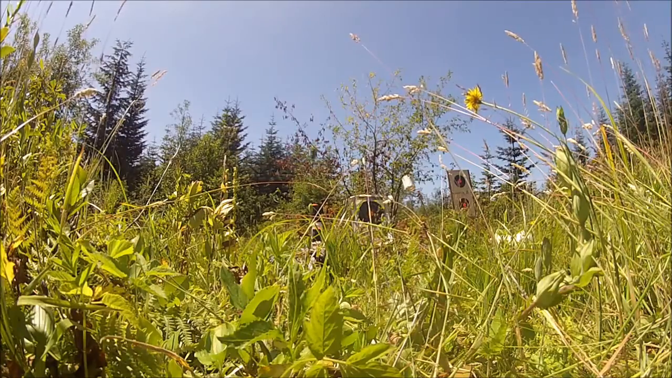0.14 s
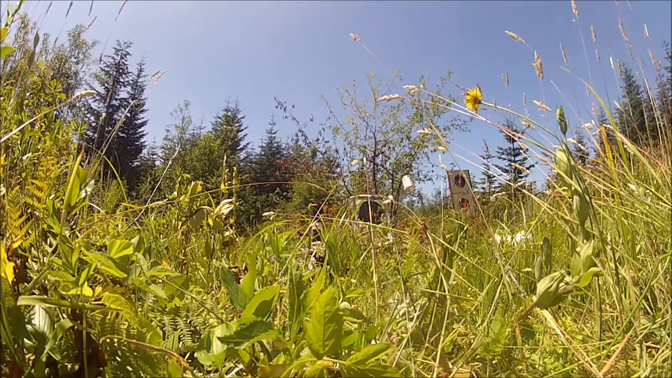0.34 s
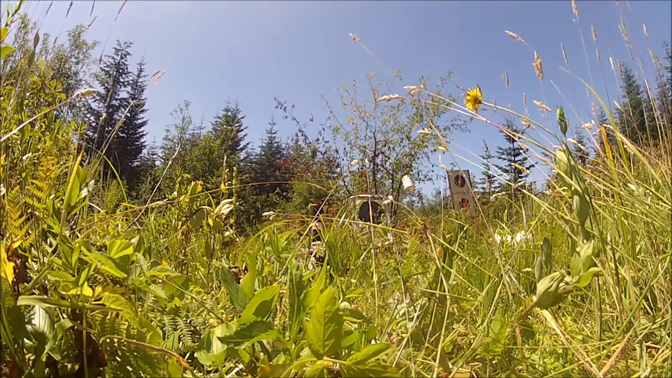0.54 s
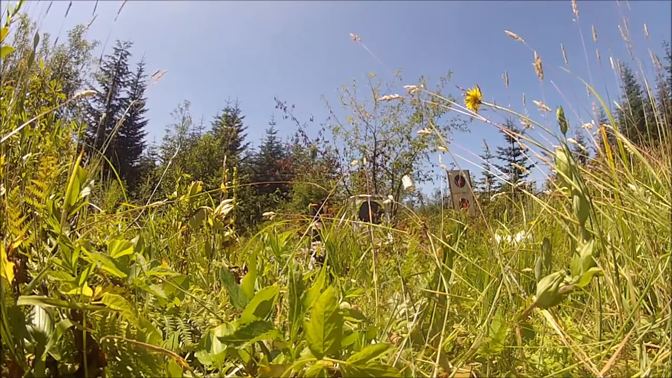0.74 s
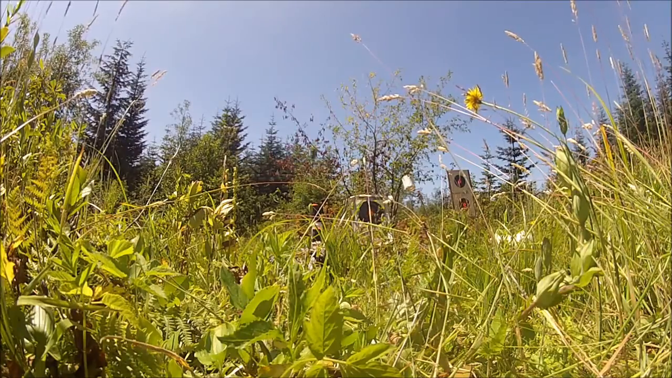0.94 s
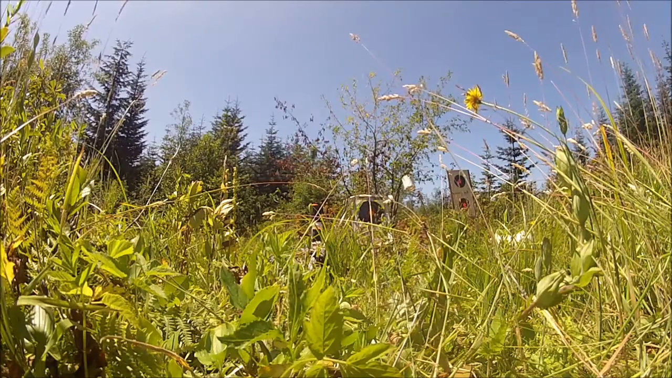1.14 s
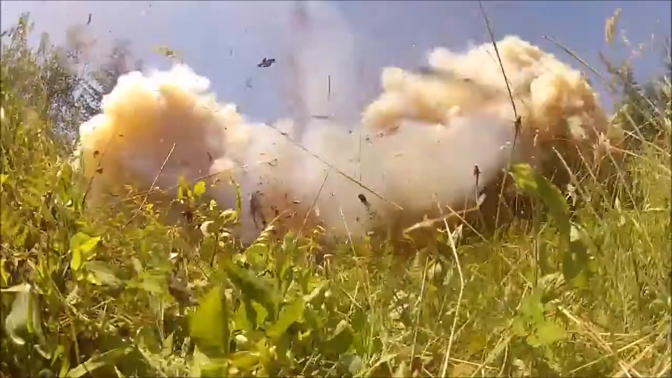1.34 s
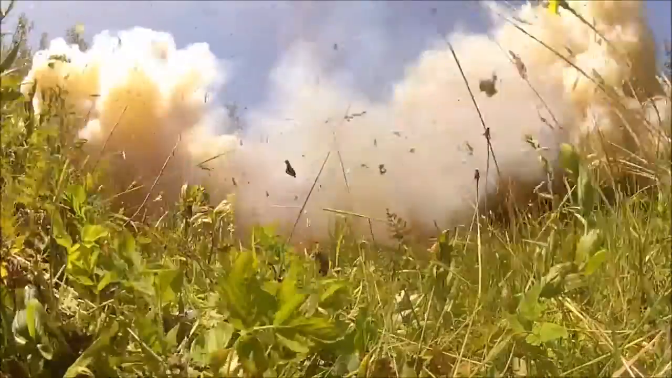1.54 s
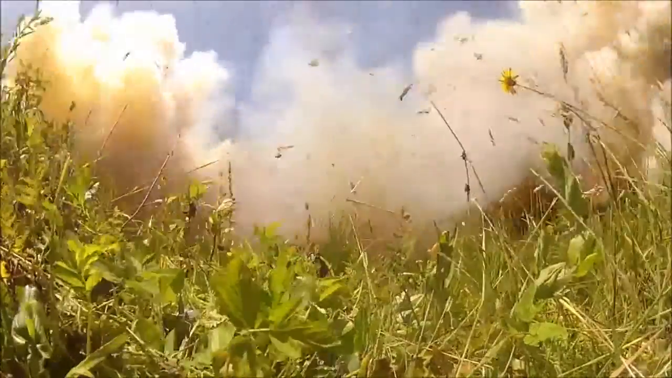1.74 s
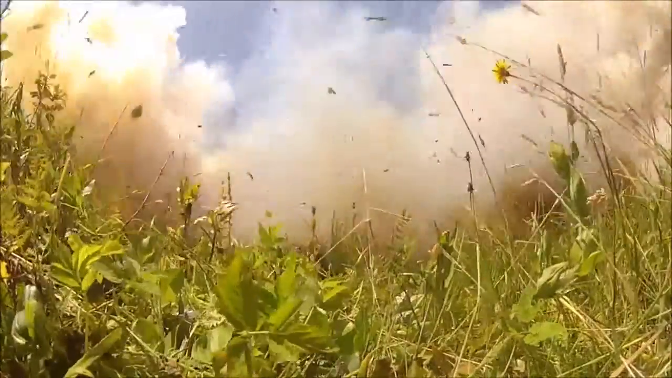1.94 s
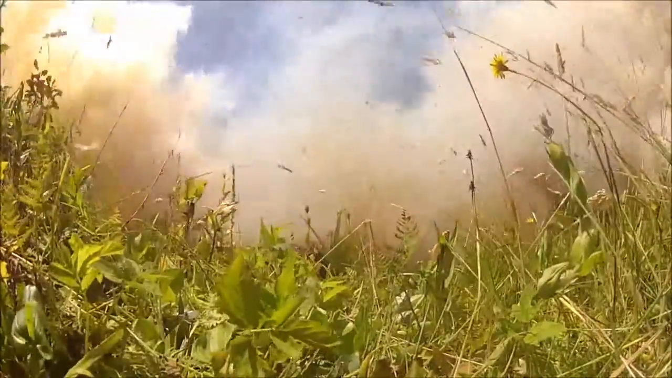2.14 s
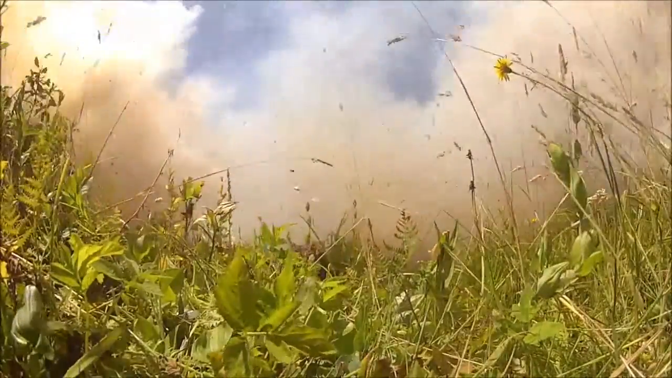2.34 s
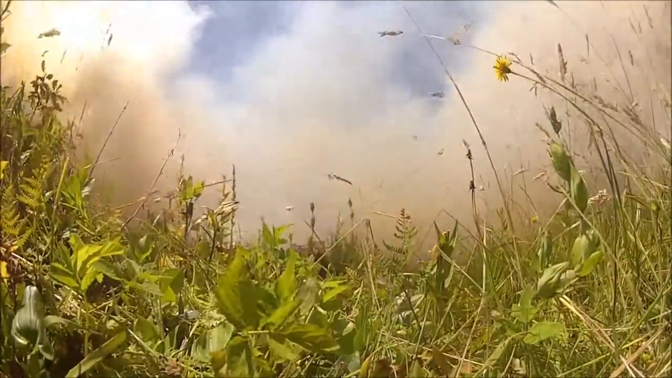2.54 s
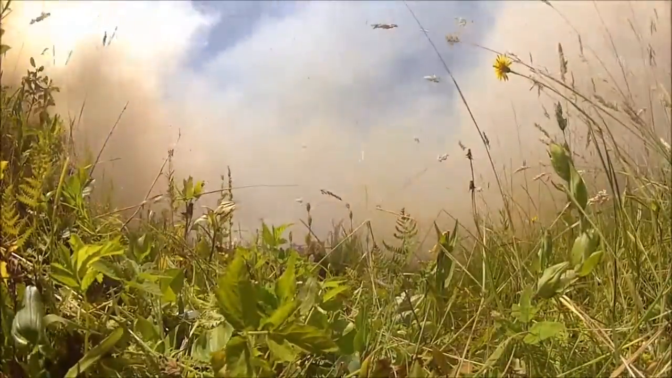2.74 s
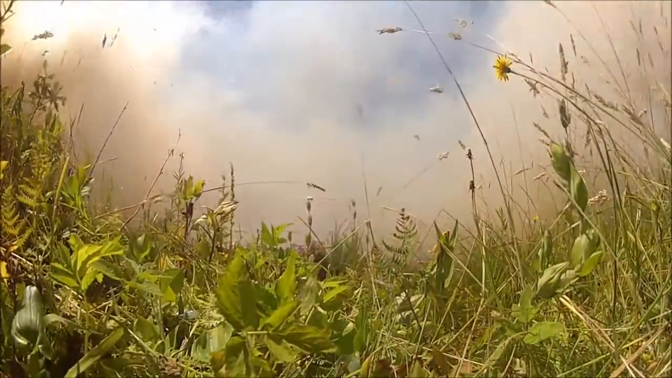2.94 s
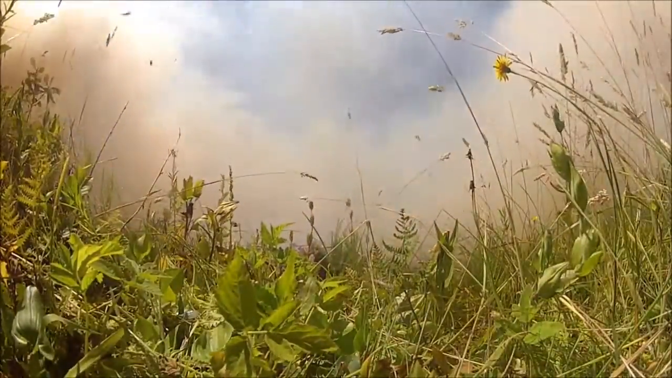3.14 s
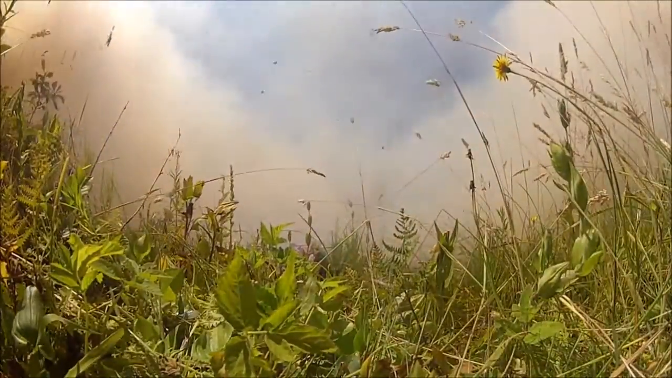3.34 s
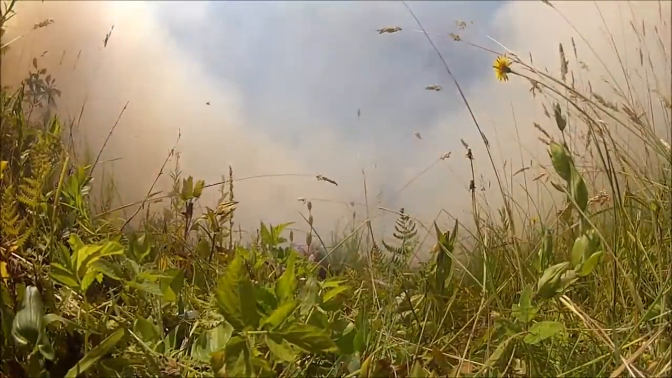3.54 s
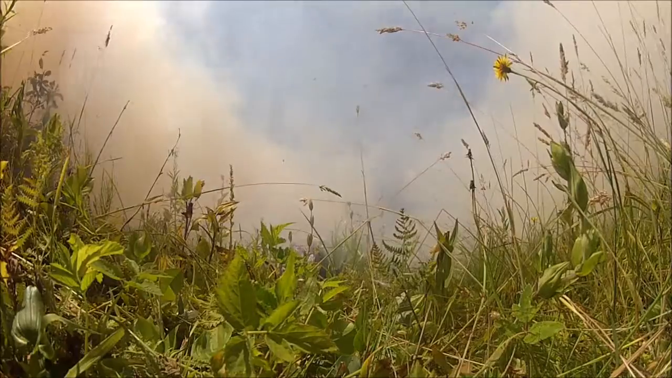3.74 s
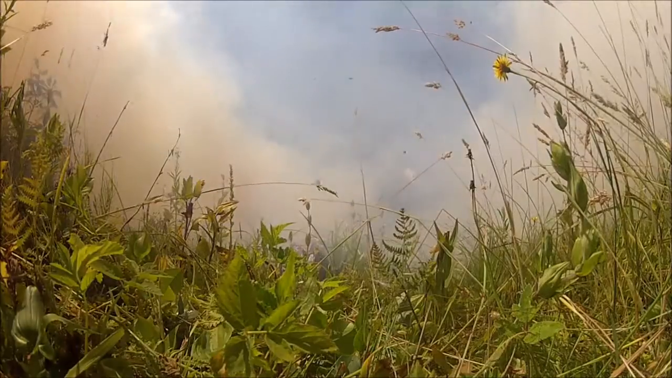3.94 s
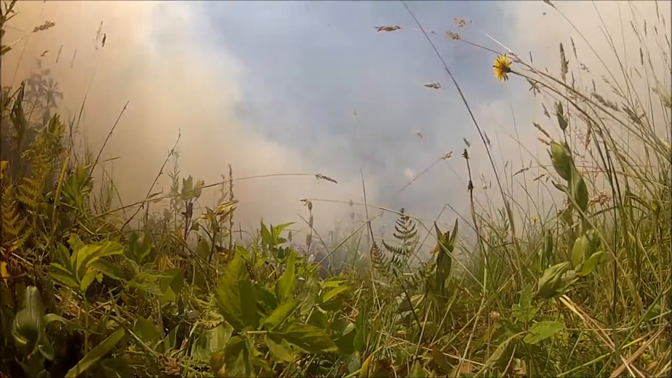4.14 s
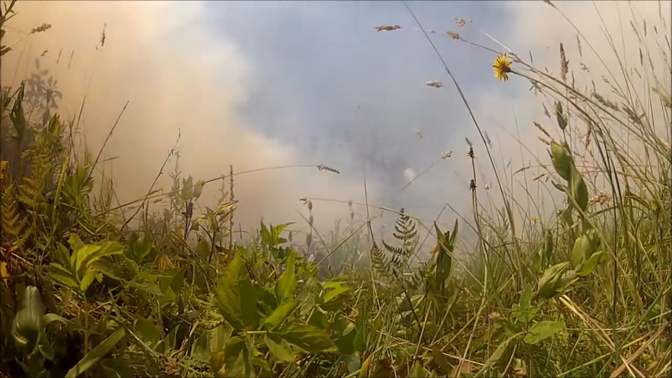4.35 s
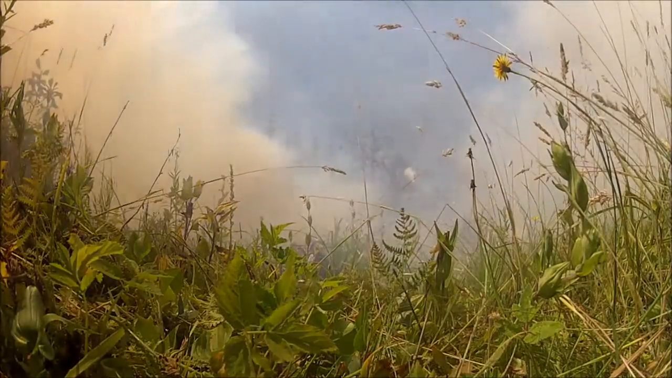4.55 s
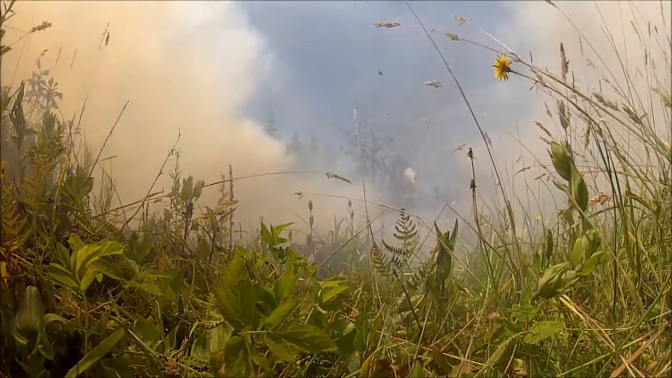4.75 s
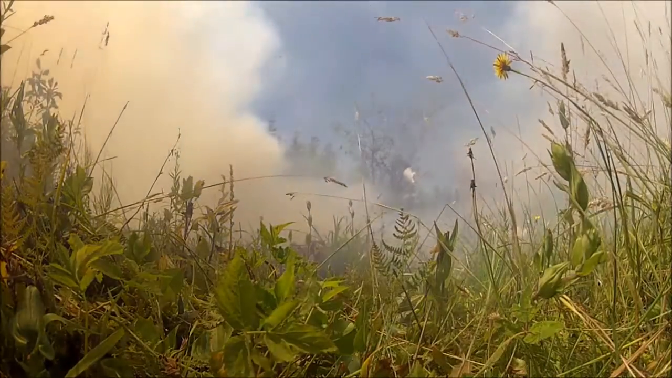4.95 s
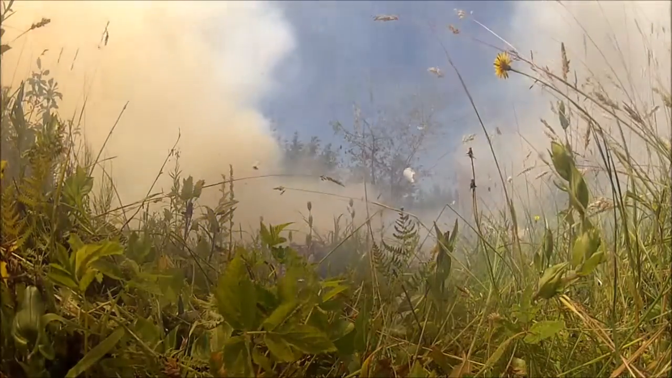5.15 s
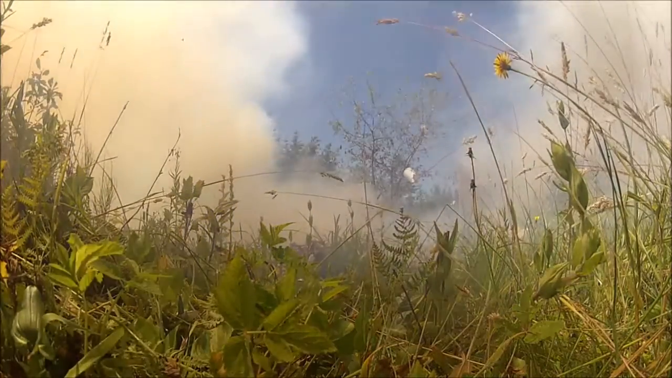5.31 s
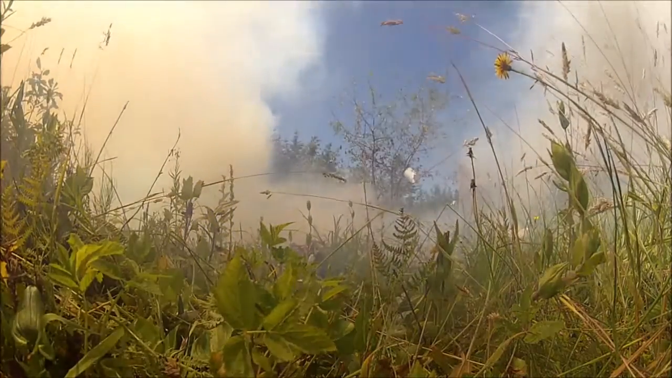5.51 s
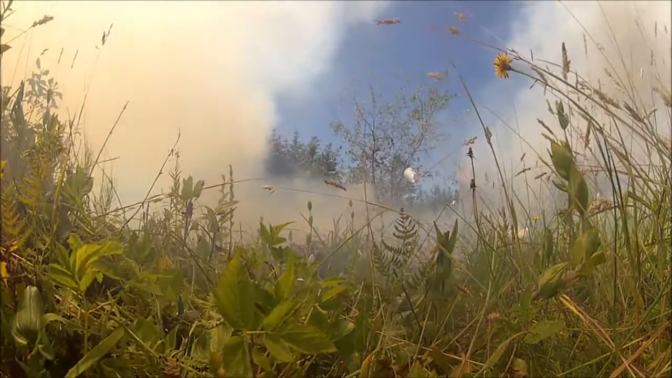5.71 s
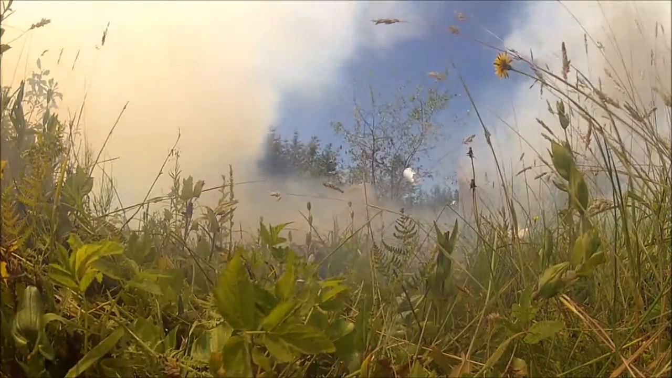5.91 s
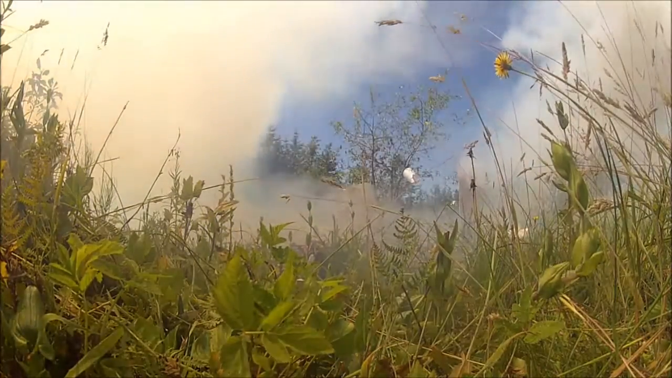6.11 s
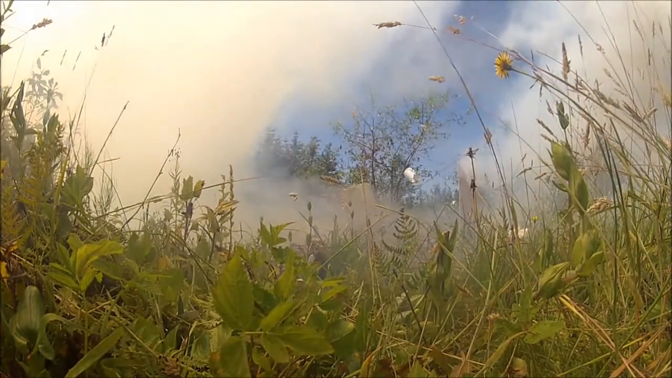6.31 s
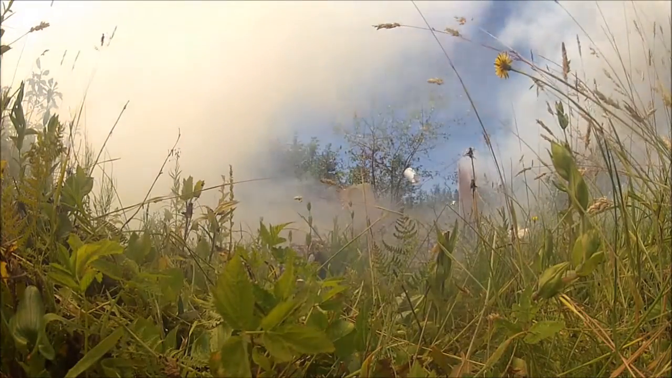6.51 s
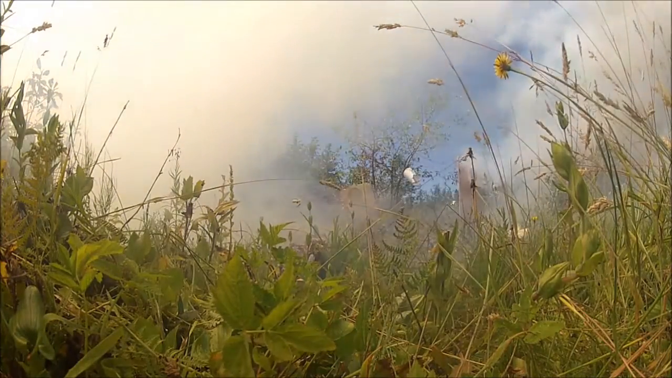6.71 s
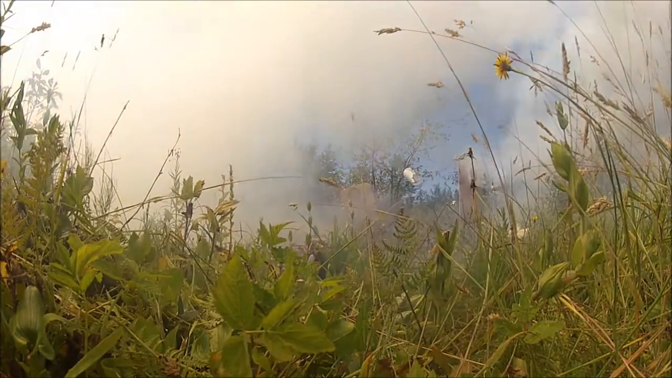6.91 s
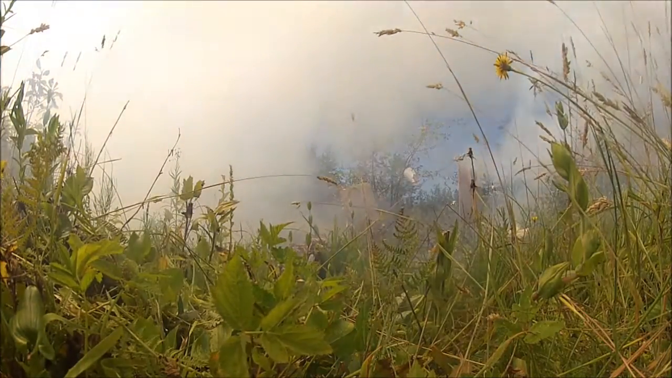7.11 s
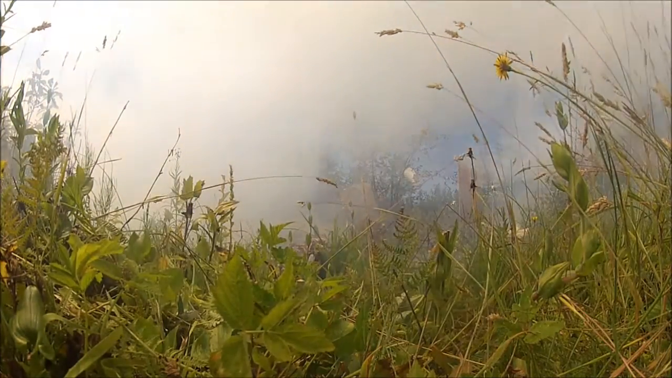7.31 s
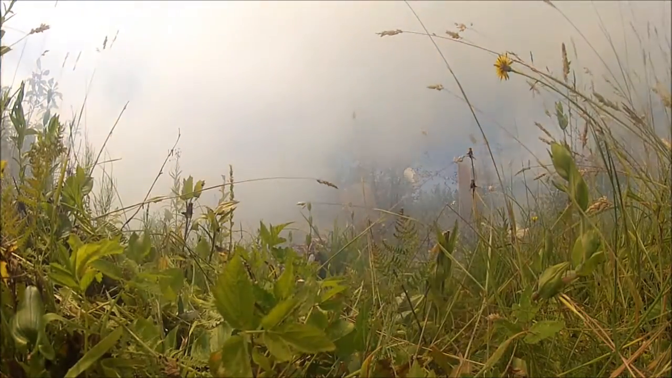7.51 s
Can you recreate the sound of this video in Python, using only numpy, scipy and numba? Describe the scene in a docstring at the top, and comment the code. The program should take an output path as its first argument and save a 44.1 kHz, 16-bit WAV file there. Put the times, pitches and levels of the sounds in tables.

```python
"""Soft air in a forest clearing is heard first, then an explosive target goes off near a small cased camera.
The shock, noise over a few big pressure swings, overloads the microphone. A noise band sinks in pitch as
the boom, and filtered noise is the roar rolled back by the woods. Then soil and stones rain down as random
grains and short noise bursts; a soft clod and a hard stone hit the camera's case."""
import sys
import numpy as np
from scipy import signal
from scipy.fft import rfft, irfft
from scipy.io import wavfile
from scipy.ndimage import uniform_filter1d
from numba import njit

SR = 44100
rng = np.random.default_rng(int(sys.argv[2]) if len(sys.argv) > 2 else 0)


def dump_mix(stems):
    """Bounce the given channels to the path in sys.argv[1] as a 16-bit WAV at rate SR."""
    frames = np.atleast_2d(stems).T  # one column per channel
    limited = np.clip(frames, -1, 1)  # hard clip at full scale
    pcm = np.round(limited * 32767).astype(np.int16)
    wavfile.write(sys.argv[1], SR, pcm)


N = 338247
T = np.arange(N) / SR
SHOCK_S = 1.3385  # the shock reaches the camera
RETURN_S = 2.05  # the main echo comes back from the forest edge


def undb(db):
    """Turn decibels into a gain."""
    return 10 ** (np.asarray(db) / 20)


def unit(x):
    """Scale a sound to an average (rms) level of 1."""
    return x / np.sqrt(np.mean(x ** 2))


def even(x, seconds):
    """Level out a sound: rms 1 within a sliding window."""
    power = np.abs(uniform_filter1d(x ** 2, max(int(seconds * SR), 2)))
    return x / np.sqrt(power + 1e-12)


def peak(x, size=128):
    """Scale a hit so that its loudest 3 ms have rms 1."""
    return x / np.sqrt(uniform_filter1d(x ** 2, size).max())


def noise():
    """White noise: all pitches equally strong."""
    return rng.standard_normal(N)


def walk(rate):
    """Slow random wander around 0, spread near 1, with `rate` new values per second."""
    return 1.2 * np.interp(T * rate, np.arange(2000), rng.standard_normal(2000))


def fade(t, t60):
    """Exponential decay: 60 dB quieter after t60 seconds."""
    return np.exp(-np.log(1000) * t / max(t60, 1e-3))


def add(out, s, x):
    """Mix x into out, starting at s seconds."""
    i = int(s * SR)
    out[i:i + len(x)] += x[:N - i]


def colour(x, points, size=8192):
    """Filter that follows (f/Hz, level/dB) points and falls away below the first."""
    hz, db = np.transpose(points)
    f = np.arange(size // 2 + 1) * SR / size + 1
    gain_db = np.interp(np.log(f), np.log(hz), db) + 20 * np.minimum(np.log(f / hz[0]), 0)
    # folding the cepstrum makes the filter answer at once, with nothing before the sound
    cepstrum = irfft(np.log(undb(gain_db)))
    cepstrum[1:size // 2] *= 2
    cepstrum[size // 2 + 1:] = 0
    response = irfft(np.exp(rfft(cepstrum)))
    return signal.fftconvolve(x, response)[:len(x)]


@njit
def svf(x, hz, width):
    """Band-pass filter whose centre and width may move."""
    y, b, l = np.empty(len(x)), 0., 0.
    for i in range(len(x)):
        g, k = np.tan(np.pi * hz[i] / SR), width[i] / hz[i]
        v = (b + g * (x[i] + 1e-18 - l)) / (1 + g * (g + k))
        b, l, y[i] = 2 * v - b, l + 2 * g * v, k * v
    return y


def band(x, hz, width_hz):
    """One resonance, gain 1 at its centre."""
    return svf(x, hz * np.ones(len(x)), width_hz * np.ones(len(x)))


def double_band(x, hz, width_hz):
    """The same resonance twice, for steeper sides."""
    return band(band(x, hz, width_hz), hz, width_hz)


@njit
def follow(x, attack, release):
    """Track the loudness: rise fast, fall slowly."""
    out, e = np.empty(len(x)), 0.
    for i in range(len(x)):
        e += (abs(x[i]) - e) * (attack if abs(x[i]) > e else release)
        out[i] = e
    return out


# filter curve for the still air: f/Hz, level/dB
AIR_FILTER = [(15, -39), (25, -1), (87, -5.5), (117, 0), (145, -5), (185, -2.5), (293, -6.5), (1070, -25),
              (4740, -33.5), (6050, -41.5), (12500, -40.5), (14800, -42.5), (16000, -58)]
AIR_DB, LATE_AIR_RISE_DB = -56.5, 1.4  # level before the shock; rise over the second after it


def clearing():
    """Soft low rush of air in the trees: filtered noise with a slowly wandering level."""
    air = unit(colour(noise(), AIR_FILTER)) * undb(0.88 * walk(6.7))
    return air * undb(AIR_DB + LATE_AIR_RISE_DB * np.clip(T - SHOCK_S, 0, 1))


# ringing tones (modes) of the camera case: f/Hz, level/dB, t60/s
CASE_MODES = [(1616, -7.5, 0.06), (2396, 2.5, .02), (2922, -3.5, 0.028), (3150, -0.5, .035),
              (3425, -5.5, .035), (3947, -6, .035), (4820, -3.5, 0.03), (5300, -5.5, 0.024),
              (7170, -7.5, 0.035), (9000, -7, 0.038), (9516, -4.5, .02), (14800, -4, 0.015)]


def case(x, size=4096):
    """The case answers a push by ringing at its own modes, each dying away at its own speed."""
    t = T[:size]
    ring = sum(undb(db) * np.sin(2 * np.pi * hz * t) * fade(t, t60) for hz, db, t60 in CASE_MODES)
    return signal.fftconvolve(x, ring)[:len(x)]


# filter curve for the crash noise, with a deep dip near 11 kHz: f/Hz, level/dB
CRASH_FILTER = [(180, -37), (300, 0.5), (946, -17.5), (1080, -16), (2980, -10), (3240, -7.5), (4990, -12.5),
                (5800, -26.5), (6960, -15), (8940, -18.5), (10700, -39.5), (14700, -34), (16000, -41)]
CRASH_LENGTH_S = .034  # after this the crash dies away fast


def shock(crash_db=-6, fall_db=13, ring_db=-4, swing_db=0, swing_hz=95, rise_hz_per_s=3500, push_db=-7):
    """The front arrives: a harsh crash shakes the case, over a few huge pressure swings."""
    t = T[:SR // 6]
    gate = fade(np.maximum(t - CRASH_LENGTH_S, 0), 0.057) * undb(crash_db - fall_db * t / CRASH_LENGTH_S)
    crash = unit(colour(noise(), CRASH_FILTER)) + undb(ring_db) * unit(case(noise()))
    crash = even(crash, 0.0022)[:len(t)]
    # the swings speed up as they go, then die away
    swing = -np.sin(2 * np.pi * (swing_hz * t + rise_hz_per_s * t ** 2 / 2))
    swing = swing * fade(np.maximum(t - .019, 0), 0.011) * np.minimum(.5 + t / 0.06, 1)
    # a slow heave of air lies under the swings
    push = -np.sin(2 * np.pi * 38 * t) * fade(t, 0.25)
    out = np.zeros(N)
    add(out, SHOCK_S, gate * crash + undb(swing_db) * swing + undb(push_db) * push)
    return out


def swell(db, rise_db_per_s, fall_db_per_s):
    """Gain that builds until the echo's main return and dies away after it."""
    before, after = np.maximum(RETURN_S - T, 0), np.maximum(T - RETURN_S, 0)
    return undb(db - rise_db_per_s * before - fall_db_per_s * after)


# the boom holds its pitch for a moment, then sinks towards a deep rumble
BOOM_START_HZ, BOOM_END_HZ, SINK_FROM_S, SINK_TIME_S = 190, 30, 1.41, .075
# filter curve for the roar: f/Hz, level/dB
ROAR_FILTER = [(40, -13), (100, -6), (170, 1), (280, 0), (420, -6.5), (660, -7.5), (850, -22), (1150, -35),
               (2000, -44)]
# main part and long tail of boom and roar: level/dB at the main return, rise/(dB/s), fall/(dB/s)
BOOM_MAIN = (-7, 5, 68)
BOOM_LONG = (-19, 20, 15)
ROAR_MAIN = (-17.5, 19, 20)
ROAR_LONG = (-35.5, 20, 6.7)


def echo(boom_width=0.83, burst_db=-16, burst_s=1.395, burst_t60=.12):
    """The boom sinks in pitch while the trees scatter a roar; each has a swell and a long tail."""
    sink = 1 + np.maximum(T - SINK_FROM_S, 0) / SINK_TIME_S
    hz = BOOM_END_HZ + (BOOM_START_HZ - BOOM_END_HZ) / sink
    boom = even(double_band(noise(), hz, boom_width * hz), 0.12)
    roar = even(colour(noise(), ROAR_FILTER), 0.04) * undb(1.2 * walk(25))
    # the nearest ground and bushes answer at once
    burst = undb(burst_db) * fade(np.maximum(T - burst_s, 0), burst_t60)
    boom_gain = np.hypot(swell(*BOOM_MAIN), swell(*BOOM_LONG))
    roar_gain = np.hypot(swell(*ROAR_MAIN) + burst, swell(*ROAR_LONG))
    return boom * boom_gain + roar * roar_gain


# thrown soil comes down in a steady shower, thins out and stops
SHOWER_START_S, SHOWER_FULL_S, SHOWER_THINS_S, SHOWER_END_S = 2.2, 2.9, 5.1, 5.95
SHOWER_STOP_DB_PER_S = 90


def shower(db, thin_db_per_s):
    """Gain of the falling soil: it sets in, holds and thins out."""
    onset = np.clip((T - SHOWER_START_S) / (SHOWER_FULL_S - SHOWER_START_S), 0, 1)
    thinning_db = thin_db_per_s * np.maximum(T - SHOWER_THINS_S, 0)
    stopping_db = SHOWER_STOP_DB_PER_S * np.maximum(T - SHOWER_END_S, 0)
    return onset * undb(db - thinning_db - stopping_db)


def grains(per_s, spread_db):
    """Random clicks of very unequal size."""
    size_db = spread_db * np.minimum(rng.exponential(size=N), 4)
    return (rng.random(N) < per_s / SR) * noise() * undb(size_db)


# filter curve for the hiss and patter: strongest near 2 kHz, with narrow dips
# near 6.1, 10.8 and 13.4 kHz: f/Hz, level/dB
HISS_FILTER = [(800, -15), (1300, -6), (2000, 2.5), (3200, -1), (5100, -10.5), (6100, -26), (7000, -12.5),
               (9300, -9.5), (10800, -18.5), (12200, -7), (13400, -18.5), (15300, -16)]
# grit blown about by the blast: level/dB at the main return, rise/(dB/s), fall/(dB/s)
GRIT_BLOWN = (-33.5, 1, 21)
# filter curve for distant lumps landing: f/Hz, level/dB
THUD_FILTER = [(120, -10.5), (300, 3.5), (500, 4), (760, 5), (980, -10.5), (1400, -17.5), (2500, -23)]
# basic rate of grains, which halves again and again after the return
GRAINS_PER_S, GRAINS_HALVE_S = 2400, 1.1


def fallout(hiss_db=-3, late_hiss_db=-8, patter_db=-5, ring_db=-8, smear_t60=0.012, tick_db=-5):
    """Grit hisses through the leaves, then thins into single ticks and the dull thuds of distant lumps."""
    blown, falling = swell(*GRIT_BLOWN), shower(db=-52.5, thin_db_per_s=15)
    hiss = unit(colour(noise(), HISS_FILTER)) * undb(0.93 * walk(28))
    # grains come down in clusters
    per_s = GRAINS_PER_S * .5 ** (np.maximum(T - RETURN_S, 0) / GRAINS_HALVE_S) * undb(7.3 * walk(22))
    clicks = grains(per_s=per_s, spread_db=3.4)
    # each one brushes the grass for a few milliseconds
    brush_power = signal.fftconvolve(clicks ** 2, fade(T[:SR // 20], smear_t60) ** 2)[:N]
    brush = noise() * np.sqrt(np.abs(brush_power))
    landings = unit(brush) + undb(tick_db) * unit(clicks)
    patter = unit(colour(landings, HISS_FILTER)) + undb(ring_db) * unit(case(landings))
    patter = even(patter, .4)
    thuds = even(colour(grains(per_s=210, spread_db=0), THUD_FILTER), .25)
    hiss_gain = np.hypot(undb(hiss_db) * blown, undb(late_hiss_db) * falling)
    patter_gain = np.hypot(undb(patter_db) * blown, falling)
    return hiss * hiss_gain + patter * patter_gain + thuds * shower(db=-52.5, thin_db_per_s=5)


def shudder(db=-4, hz=192, t60=.3, peak_s=1.405, rise_s=.04):
    """The shock leaves a brief low hum whose pitch wavers at random."""
    gain = np.clip(1 + (T - peak_s) / rise_s, 0, 1) * fade(np.maximum(T - peak_s, 0), t60)
    wavering_hz = hz * (1 + .08 * walk(90))
    return undb(db) * gain * np.sin(2 * np.pi * np.cumsum(wavering_hz) / SR)


def knock(t, t60, hz=660, width_hz=400):
    """Dull answer of the ground to a landing: a short noise burst through a resonance."""
    return peak(double_band(rng.standard_normal(len(t)) * fade(t, t60), hz, width_hz))


# filter curve for the contact noise, crumbs and scrapes, with a deep dip near 11 kHz: f/Hz, level/dB
CONTACT_FILTER = [(150, -14.5), (450, -12), (720, -10.5), (1200, -24), (1700, -3), (2400, 1), (4200, -2),
                  (6000, -16), (7400, -2.5), (9400, -5), (11000, -29), (13000, -24), (15000, -14)]
# falling stones and chips: t/s, level/dB before the common trim, ring f/Hz
CHIP_LANDINGS = [(1.4795, -22, 2600), (2.3574, -3, 1930), (2.5442, -27, 3160), (2.5857, -28, 2300),
                 (2.7102, -25.5, 2250), (2.7939, -15, 2150), (2.9623, -29, 2320), (3.1938, -21, 2720),
                 (3.2873, -31.5, 4400), (3.764, -26.5, 3100), (3.9609, -9.5, 3050), (3.9848, -7.5, 2680),
                 (4.0332, -27, 2430), (4.1223, -11.5, 4350), (4.1604, -34.5, 2270), (4.5358, -24, 2700),
                 (4.6687, -35, 3100), (4.9384, -25, 3100), (4.9795, -28, 2140), (5.0981, -22, 2330),
                 (5.121, -25.5, 2270), (5.334, -35.5, 3060), (5.3858, -35.5, 4300), (5.49, -40, 2400),
                 (5.9755, -39.5, 3090)]
# the soft ground yields: its knock grows only by a share of each dB of the blow
KNOCK_DB, KNOCK_SHARE = -24, .5
# smaller chips ring higher and knock less than a chip of the usual size
USUAL_CHIP_HZ, KNOCK_DB_PER_OCTAVE = 2400, -13


def chips(trim_db=-6, ring_db=2, ring_width_hz=1300, case_db=-11, tail_db=-14, contact_t60=.008,
          rattle_t60=0.021, rise_s=.0009, edge_db=-7.5):
    """Stones and chips land close by: a hard contact, a short rattle and a ring of their own."""
    out, t = np.zeros(N), T[:SR // 10]
    below = signal.butter(3, 6000, "low", fs=SR, output="sos")
    above = signal.butter(3, 6000, "high", fs=SR, output="sos")
    force = fade(t, contact_t60) + undb(tail_db) * fade(t, rattle_t60)
    force = force * (1 - np.exp(-(t / rise_s) ** 2))
    for s, db, hz in CHIP_LANDINGS:
        contact = rng.standard_normal(len(t)) * force
        crack = peak(colour(contact, CONTACT_FILTER)) + undb(case_db) * peak(case(contact))
        ring = peak(double_band(contact, hz, ring_width_hz))
        body = peak(peak(signal.sosfilt(below, crack)) + undb(ring_db) * ring)
        # the sharpest part of the contact gives a bright edge
        edge = undb(edge_db) * peak(signal.sosfilt(above, np.diff(crack, prepend=0)))
        ground_db = KNOCK_DB + KNOCK_SHARE * db + KNOCK_DB_PER_OCTAVE * np.log2(hz / USUAL_CHIP_HZ)
        ground = undb(ground_db) * knock(t, rattle_t60)
        add(out, s, undb(trim_db) * (undb(db) * (body + edge) + ground))
    return out


def far_echo(db=-41.5, hz=155, width_hz=110, centre_s=3.65, spread_s=.55):
    """Distant slopes hand back a soft, hollow swell of the boom: noise in a low band."""
    hollow = unit(double_band(noise(), hz, width_hz))
    return hollow * undb(db) * np.exp(-((T - centre_s) / spread_s) ** 2)


# sprays of loose soil: t/s, level/dB before the common trim, knock level/dB against the rustle, t60/s
SOIL_SPRAYS = [(3.3916, -29, 0, 0.1), (3.437, -19, -7, 0.13), (4.0065, -19, 4, 0.073),
               (4.5358, -31, 15, 0.08), (4.8491, -31.5, 1, 0.087), (4.9003, -28, 6, 0.091),
               (5.0726, -32, 6, 0.08), (5.2227, -33.5, -2, 0.1), (5.6403, -23, -4, 0.14),
               (5.7942, -41, 0, 0.08), (5.8693, -36.5, 1, 0.07)]


def sprays(trim_db=-14, rise_s=.004, spread_db=4):
    """Lumps of soil burst into crumbs in the grass: uneven noise bursts, each with a dull knock."""
    out, t = np.zeros(N), T[:SR // 5]
    for s, db, knock_db, t60 in SOIL_SPRAYS:
        crumbs = rng.standard_normal(len(t)) * undb(spread_db * walk(490)[:len(t)])
        rustle = peak(colour(crumbs * fade(t, t60) * (1 - np.exp(-t / rise_s)), CONTACT_FILTER))
        add(out, s, undb(db + trim_db) * (rustle + undb(knock_db) * knock(t, t60 / 2)))
    return out


# soft blow on the case: t/s, level/dB, f/Hz that sets the speed of the shove, t60/s
CLOD_BLOW = (3.683, 16.5, 137, 0.012)


def clod(scrape_db=-21, scrape_t60=0.019):
    """A soft clod shoves the case once; a slower swing back follows."""
    out, t = np.zeros(N), T[:SR // 10]
    s, db, hz, t60 = CLOD_BLOW
    shove = -2 * np.pi * hz * t * (1 - 2.67 * hz * t) * fade(t, t60)
    scrape = peak(colour(rng.standard_normal(len(t)) * fade(t, scrape_t60), CONTACT_FILTER))
    add(out, s, undb(db) * (shove + undb(scrape_db) * scrape))
    return out


# hard blow on the case: t/s, level/dB, ring f/Hz, t60/s
STONE_BLOW = (4.7368, 6, 2400, .008)


def stone(contact_s=.003, scrape_db=-17, thud_db=-14, thud_hz=190, knock_db=-11, knock_hz=1200, edge_db=-15):
    """A hard stone chatters on the case for a moment and stops dead: tones plus filtered noise."""
    out, t = np.zeros(N), T[:SR // 10]
    s, db, hz, t60 = STONE_BLOW
    grit = rng.standard_normal(len(t))
    ring = -np.sin(2 * np.pi * hz * t) + undb(thud_db) * np.sin(2 * np.pi * thud_hz * t)
    # the sharp edge reaches the two highest modes of the case
    edge = sum(unit(band(grit, mode[0], 700)) for mode in CASE_MODES[-2:])
    scrape = undb(scrape_db) * unit(colour(grit, CONTACT_FILTER))
    dull_knock = undb(knock_db) * unit(band(grit, knock_hz, 700))
    rattle = scrape + undb(edge_db) * edge + dull_knock
    gain = fade(np.maximum(t - contact_s, 0), t60) * np.minimum(t / .0003, 1)
    add(out, s, undb(db) * (ring + rattle) * gain)
    return out


def scene():
    """Blast, echo and falling debris over the quiet clearing."""
    # echo and fallout fade in just after the shock
    arrival = np.clip((T - SHOCK_S - .012) / .03, 0, 1)
    rolling = arrival * (echo() + fallout() + far_echo())
    debris = chips() + sprays() + clod() + stone()
    return (clearing() + shock() + shudder() + rolling + debris)[None]


def record(dry, threshold=0.73, attack_s=0.0023, release_s=0.035, ceiling=.92, top_hz=15700):
    """The limiter is too slow for the blows: their tops are cut flat, then the level ducks briefly."""
    envelope = follow(dry[0], 1 / (attack_s * SR), 1 / (release_s * SR))
    limited = dry / np.maximum(envelope / threshold, 1)
    held = np.clip(limited, -ceiling, ceiling)
    # a steep filter removes the highest treble
    return signal.sosfilt(signal.ellip(8, .2, 70, top_hz, fs=SR, output="sos"), held)


dry = scene()
out = record(dry)
dump_mix(out)
```